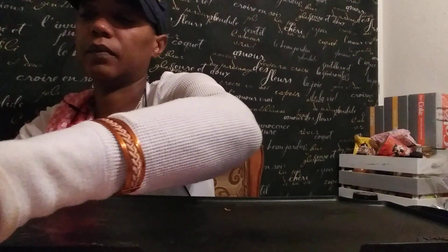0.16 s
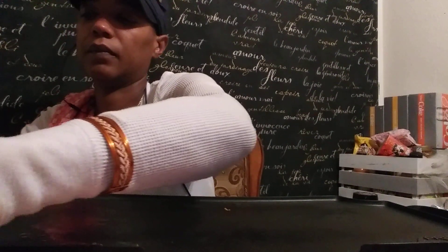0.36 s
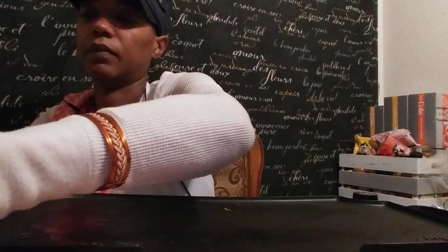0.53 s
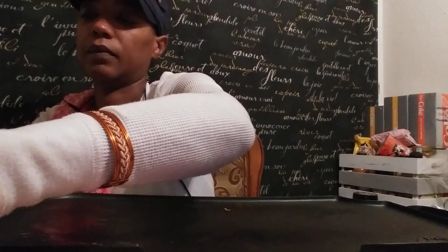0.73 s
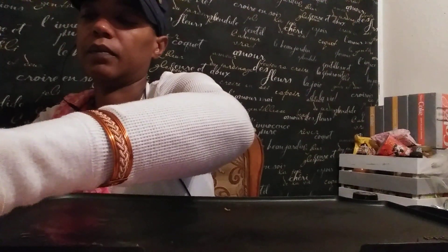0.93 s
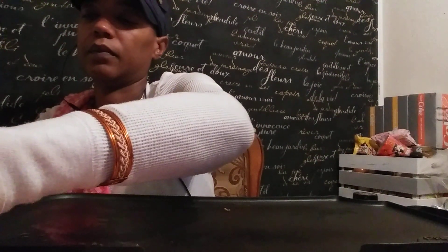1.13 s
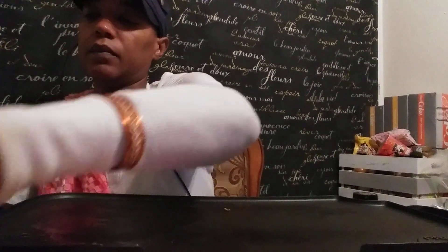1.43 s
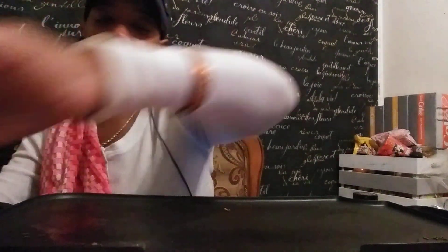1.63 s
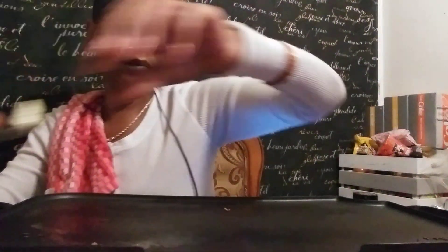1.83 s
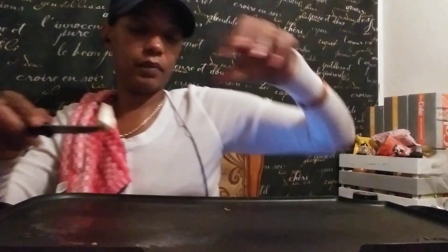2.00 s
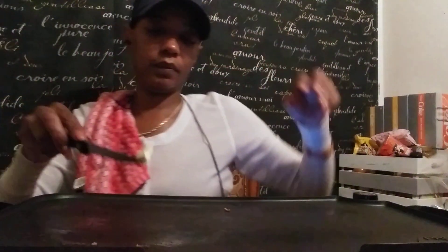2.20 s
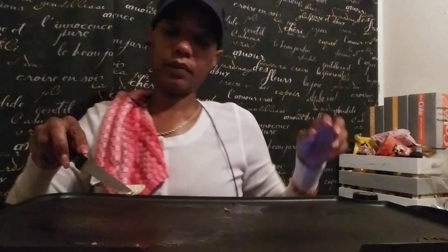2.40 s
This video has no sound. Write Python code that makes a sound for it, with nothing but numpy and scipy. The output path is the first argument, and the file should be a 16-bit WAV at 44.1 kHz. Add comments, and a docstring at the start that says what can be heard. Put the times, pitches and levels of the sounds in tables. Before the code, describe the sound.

Hard close clicks, a short ratcheting turn and one sharp snap in a quiet kitchen

```python
"""Hard clicks in a quiet kitchen

Close to the microphone a hand works something hard, probably a griddle's control: light clicks, a short
ratcheting turn, a soft knock and one sharp snap. Each is a burst of contact force filtered by a damped body;
echoes and a diffuse tail stand for the griddle top and the walls. Metal rings faintly as decaying sines,
and a fan-like hum and a thin hiss, both filtered noise, carry on underneath."""
import sys
import numpy as np
from scipy import signal
from scipy.fft import rfft, irfft
from scipy.io import wavfile
from scipy.ndimage import uniform_filter1d, minimum_filter1d

SR = 44100
rng = np.random.default_rng(int(sys.argv[2]) if len(sys.argv) > 2 else 0)


def to_wav(s):
    """Save 16-bit WAV."""
    ch = np.atleast_2d(s).T  # columns
    pcm = np.round(np.clip(ch, -1, 1) * 32767)  # PCM
    wavfile.write(sys.argv[1], SR, pcm.astype(np.int16))


N = 112454  # length [samples]


def amp(db):
    """Level to amplitude: 20 dB is a factor of ten."""
    return 10 ** (np.asarray(db) / 20)


def unit(x):
    """Power normalisation: scales to rms 1."""
    return x / np.sqrt(np.mean(x ** 2) + 1e-20)


def packet(x):
    """Energy normalisation: scales the sum of squares to 1."""
    return x / (np.linalg.norm(x) + 1e-20)


def read(points, hz):
    """Interpolation along a logarithmic frequency axis."""
    f, value = np.transpose(points)
    return np.interp(np.log(hz + 1), np.log(f + 1), value)


def add(mix, s, sound):
    """Superposition: sums a sound into the mix, in place, from a given time."""
    part = mix[max(round(s * SR), 0):][:len(sound)]
    part += sound[:len(part)]


def noise(colour):
    """Spectral shaping: white noise weighted to a given spectrum, at rms 1."""
    spectrum = rfft(rng.standard_normal(N))
    gain = amp(read(colour, np.fft.rfftfreq(N, 1 / SR)))
    return unit(irfft(spectrum * gain, N))


def body(colour, tilt_db=0, size=2048):
    """Minimum phase: the causal response of a damped object, tilted in dB per octave about 4 kHz."""
    hz = abs(np.fft.fftfreq(size, 1 / SR))
    octaves = np.log2(np.maximum(hz, 300) / 4000)
    log_gain = np.log(amp(read(colour, hz) + tilt_db * octaves))
    # the Hilbert transform of the log gain supplies the phase
    response = np.fft.ifft(np.exp(np.conj(signal.hilbert(log_gain)))).real
    return packet(response[:size // 2])


# chatter after an ordinary contact: level relative to the blow [dB], decay constant [s]
RATTLE_DB, RATTLE_S = -16, 0.005


def contact(s, scrape_s, crack_s, rattle_db=RATTLE_DB, rattle_s=RATTLE_S, hold_s=0, size=2048, count=8):
    """Impact force: a rising scrape, the blow and a brief chatter, nearly flat in spectrum."""
    t = (np.arange(size) - size // 4) / SR
    after = np.maximum(t - hold_s, 0)
    rise = np.exp(-abs(t) / max(scrape_s, 1 / SR))
    decay = np.maximum(np.exp(-after / crack_s), amp(rattle_db) * np.exp(-after / rattle_s))
    shape = np.where(t < 0, rise, decay)
    force = shape * rng.standard_normal(size)
    for _ in range(count):
        # flatten the spectrum, then restore the envelope
        force = irfft(np.exp(1j * np.angle(rfft(force))))
        local_rms = np.sqrt(abs(uniform_filter1d(force ** 2, size=24)) + 1e-14)
        force = shape * np.tanh(force / local_rms)
    out = np.zeros(N)
    add(out, s + t[0], packet(force))
    return out


def strike(force, colour, tilt_db=0):
    """Convolution: the force excites the response of the body it acts on."""
    return signal.oaconvolve(force, body(colour, tilt_db))[:N]


def catches(rows, colour, crack_s):
    """Stick and impact: parts scrape briefly and then catch."""
    out = np.zeros(N)
    for s, db, scrape_s, tilt_db in rows:
        out += amp(db) * strike(contact(s, scrape_s, crack_s), colour, tilt_db)
    return out


def ring(hz, db, t60, waver_hz=0):
    """Modal decay: one exponentially dying mode, cut at half a second, its pitch perhaps unsteady."""
    t = np.arange(SR // 2) / SR
    pitch = hz + waver_hz * unit(uniform_filter1d(rng.standard_normal(len(t)), size=300))
    return amp(db - 60 * t / t60) * np.sin(2 * np.pi * np.cumsum(pitch) / SR)


# colour of the snap: (frequency [Hz], relative gain [dB])
SNAP_COLOUR = [(100, -21.5), (400, -18), (680, -21.5), (860, -13), (1100, -30), (1450, -16), (1850, -9.5),
               (2060, -21), (2280, -12.5), (2750, -29), (3900, -7.5), (4450, -9.5), (5050, -4.5),
               (6200, -11), (7650, 2.5), (8250, 0.5), (9000, 2.5), (10100, -5.5), (11500, -16.5),
               (16000, -28)]
# early reflections of the snap: (time [s], level relative to the direct snap [dB])
SNAP_REFLECTIONS = [(1.0683, -8), (1.0715, -10.5), (1.0730, -13), (1.0773, -16)]
SNAP_S, SNAP_CRACK_S, SNAP_HOLD_S = 1.0614, 0.0004, 0.001  # onset, decay constant, time held before it [s]


def snap():
    """Snap-through: a stiff spring flips over with a sharp crack and brief rattle; surfaces and room answer."""
    force = contact(SNAP_S, 0.0002, SNAP_CRACK_S, rattle_db=-10, hold_s=SNAP_HOLD_S)
    for s, db in SNAP_REFLECTIONS:
        force = force + amp(db) * contact(s, 0, SNAP_CRACK_S, hold_s=SNAP_HOLD_S)
    add(force, SNAP_S, diffuse(tail_db=-9, scatter_db=-15))
    return strike(force, SNAP_COLOUR)


# teeth of the ratchet: (time [s], relative level [dB], scrape before the catch [s],
# treble tilt [dB per octave], knock frequency [Hz], relative knock level [dB])
TEETH = [(0.4648, -20.5, 0.00152, -.5, 1550, -33), (0.4902, -22, 0.00138, 0, 785, -32.5),
         (0.5144, -19.5, .001, 2.5, 1010, -46.5), (0.5372, -26, 0.00043, 4.5, 2300, -48),
         (0.5440, -26, 0.0016, 0, 2320, -39), (0.5509, -32, 0.0018, -1, 1500, -50),
         (0.5613, -29.5, .0004, 3, 2180, -48), (0.569, -39, 0.0014, 0, 2260, -61)]
# body struck by the teeth: (frequency [Hz], relative gain [dB])
TOOTH_COLOUR = [(100, -8), (400, -3.5), (830, -6.5), (1100, -7.5), (1550, -4.5), (2300, -2), (2750, -13),
                (3900, 0), (4450, -7), (5100, 0), (6600, -9), (7900, 9), (9500, -4.5), (11500, -16),
                (16000, -32)]


def ratchet():
    """Serial impact: each tooth scrapes, catches and knocks a different part of the casing."""
    out = catches([row[:4] for row in TEETH], TOOTH_COLOUR, crack_s=0.0012)
    for s, _, _, _, hz, db in TEETH:
        add(out, s, amp(db) * packet(ring(hz, 0, t60=0.0156)))
    return out


# spectrum of the rub: (frequency [Hz], relative gain [dB])
RUB_COLOUR = [(200, -10), (800, -1), (1200, -11), (2200, -11), (2800, -2), (5000, -7), (6600, -0.5),
              (8000, 2.5), (9300, -12), (11000, -2), (16000, -11)]
RUB_START_S, RUB_END_S, RUB_FADE_S = 0.466, 0.573, 0.008  # the parts grind between the teeth
GRAINS_PER_S, SPREAD_DB = 1800, 9.5  # mean rate; scale of the exponential spread in level, capped at 3 times


def rub():
    """Stick-slip friction: tiny slips, dense and uneven, for as long as the turn lasts."""
    t = np.arange(N) / SR
    slips = rng.random(N) < GRAINS_PER_S / SR
    signs = rng.choice([-1., 1.], N)
    sizes = amp(SPREAD_DB * np.minimum(rng.exponential(1, N), 3))
    grinding = unit(strike(slips * signs * sizes, RUB_COLOUR))
    turning = np.clip(np.minimum(t - RUB_START_S, RUB_END_S - t) / RUB_FADE_S, 0, 1)
    return amp(-64) * turning * grinding


# soft knocks and ticks: (time [s], relative level [dB], scrape before the blow [s], treble tilt [dB per octave])
KNOCKS = [(0.8745, -48, .002, 3.5), (0.8905, -44, .002, -3), (0.8988, -35, 0.0013, -2),
          (0.9150, -33.5, .001, -3.5), (1.1745, -31, .002, -5.5), (1.374, -52, .001, 6),
          (2.055, -52, .001, 9)]
# body struck by the knocks: (frequency [Hz], relative gain [dB])
KNOCK_COLOUR = [(100, -9.5), (400, 1), (800, -0.5), (1100, -6.5), (1600, 1.5), (2300, -2), (2800, -10),
                (4500, -5), (5200, -1), (6300, -17), (8600, 1.5), (11000, -10), (16000, -22)]


def knocks():
    """Damped impact: soft knocks and ticks, each after a brief scrape."""
    return catches(KNOCKS, KNOCK_COLOUR, crack_s=0.0022)


# light clicks: (time [s], relative level [dB], casing ring relative to the click [dB],
# treble tilt [dB per octave])
CLICKS = [(0.1604, -47.5, -10, -1.5), (0.2245, -35, -5.5, 1.5), (0.2531, -20, -16.5, 0.5),
          (0.2903, -16.5, -2.5, -1)]
# body struck by the clicks: (frequency [Hz], relative gain [dB])
CLICK_COLOUR = [(100, -36), (500, -22), (950, -10.5), (1200, -23), (2150, 0.5), (2700, -17), (3000, -9.5),
                (3800, 1.5), (4450, -5.5), (5200, 0.5), (6800, -12.5), (8200, 4), (9700, -3), (11000, -16),
                (12200, -12), (16000, -25)]
# modes of the small casing: (frequency [Hz], relative level [dB], 60 dB decay time [s])
CASING = [(2310, 8, 0.028), (2304, 17, 0.013), (3700, -26, 0.0056), (4730, -5, 0.013), (5400, -23, .008)]


def clicks():
    """Impact and modal response: light clicks in the room, each ringing a small casing."""
    blows, ringing = np.zeros(N), np.zeros(N)
    casing = packet(sum(ring(*mode) for mode in CASING))
    for s, db, ring_db, tilt_db in CLICKS:
        force = contact(s, 0, crack_s=0.0015)
        blows += amp(db) * strike(force, CLICK_COLOUR, tilt_db)
        add(ringing, s, amp(db + ring_db) * casing)
    return kitchen(blows, wet_db=-3, echo_db=-5) + kitchen(ringing, wet_db=-3, echo_db=-11)


# faint ringing metal: (start time [s], frequency [Hz], level [dB], 60 dB decay time [s])
RINGS = [(0.0, 2343, -61, 0.28), (0.0, 3030, -71.5, 0.35), (0.29, 2106, -69, .8), (0.29, 2550, -63.5, .8),
         (0.29, 3780, -70.5, 0.95)]
# spectrum of the slide: (frequency [Hz], relative gain [dB])
SLIDE_COLOUR = [(1500, -20), (2400, -3), (3600, -18), (4750, 0), (5300, -8), (6300, -20), (12000, -24)]
SLIDE_S, SLIDE_WIDTH_S = 0.05, 0.042  # centre and standard deviation of the swell


def metal():
    """Modal ringing and friction: faint decaying modes and a light slide over metal."""
    swell = np.exp(-((np.arange(N) / SR - SLIDE_S) / SLIDE_WIDTH_S) ** 2 / 2)
    out = amp(-67) * noise(SLIDE_COLOUR) * swell
    for s, hz, db, t60 in RINGS:
        add(out, s, ring(hz, db, t60, waver_hz=7))
    return out


# dull bumps of handling: (centre time [s], level [dB], frequency [Hz], half-length to 1/e [s])
BUMPS = [(0.029, -65.5, 69.5, 0.013), (0.138, -58, 353, 0.013), (0.844, -50.5, 203, .008),
         (1.008, -53.5, 110, 0.0045), (1.145, -61.5, 62, 0.032), (1.265, -63, 75, 0.014),
         (1.55, -53.5, 179, 0.016), (2.138, -56, 157, 0.0072), (2.28, -53, 174, .008),
         (2.39, -60.5, 118, 0.0085), (2.432, -65, 60, 0.027), (2.531, -61, 74.2, 0.016)]


def bumps():
    """Gaussian wave packets: soft low pushes, each only a brief group of cycles."""
    t = np.arange(N) / SR
    out = np.zeros(N)
    for s, db, hz, length in BUMPS:
        envelope = np.exp(-((t - s) / length) ** 2)
        out += amp(db) * envelope * np.sin(2 * np.pi * (hz * (t - s) + rng.random()))
    return out


# spectrum of the room tone: (frequency [Hz], relative density [dB per Hz])
ROOM_TONE = [(15, -62), (25, -34), (59, -21.5), (91, -31.5), (116, -12.5), (152, -10.5), (183, -4),
             (215, -8), (267, -6.5), (313, -8.5), (340, -8), (399, -10.5), (598, -13.5), (684, -21.5),
             (782, -18.5), (919, -23.5), (6210, -35), (8350, -28), (15500, -36.5)]
# bands of the hum: (frequency [Hz], level [dB], full width at half amplitude [Hz])
HUM = [(131.5, -73.5, 10), (183.7, -67.5, 27), (346.5, -71.5, 12), (514.6, -77.5, 8)]


def background():
    """Stationary noise: a coloured room tone, and narrow resonant bands that waver as a hum."""
    f = np.fft.rfftfreq(N, 1 / SR)
    hum = np.zeros(N)
    for hz, db, width in HUM:
        resonance = 1 / (1 + (2 * (f - hz) / width) ** 2)
        hum += amp(db) * unit(irfft(rfft(rng.standard_normal(N)) * resonance, N))
    return amp(-61.5) * noise(ROOM_TONE) + hum


# decay of the room: (frequency [Hz], 60 dB decay time [s])
TAIL_T60 = [(200, 0.45), (1000, 0.34), (2500, 0.45), (5000, .33), (8500, 0.28), (15000, 0.2)]
# spectrum of the tail: (frequency [Hz], relative gain [dB])
TAIL_COLOUR = [(200, -6.5), (1000, -2), (2400, -10.5), (4000, -5), (5000, -5.5), (8500, -0.5), (15000, 2.5)]


def diffuse(tail_db, scatter_db):
    """Diffuse field: dense scatter from things nearby, then a short tail decaying by frequency."""
    size = SR // 2
    t = np.arange(size) / SR
    hz, when, z = signal.stft(rng.standard_normal(size), SR, nperseg=256)
    decay_db = 60 * when / read(TAIL_T60, hz)[:, None]
    z = z * amp(read(TAIL_COLOUR, hz)[:, None] - decay_db)
    fade_in = np.clip(t / 0.011 - 0.5, 0, 1)
    tail = packet(signal.istft(z, SR, nperseg=256)[1][:size] * fade_in)
    scatter = packet(rng.standard_normal(size) * (t > 0.007) * np.exp(-t / 0.012))
    return amp(tail_db) * tail + amp(scatter_db) * scatter


# early reflections: (delay [s], relative level [dB])
ECHOES = [(.0068, -8.5), (.0077, -13.5), (.0096, -9.5), (.0114, -7), (.0161, -14.5)]


def kitchen(x, wet_db, echo_db):
    """Room impulse response: the direct sound, single reflections and the diffuse field."""
    response = diffuse(tail_db=wet_db - 7, scatter_db=wet_db - 9.5)
    for delay, db in ECHOES:
        add(response, delay, amp([db + echo_db]))
    return x + signal.fftconvolve(x, response)[:N]


def scene():
    """Superposition: the handling sounds in the room, over the background."""
    turn = ratchet() + rub() + knocks()
    near = snap() + kitchen(turn, wet_db=-2.5, echo_db=-14.5) + clicks()
    # one common gain lifts the close handling by 8 dB
    return (amp(8) * near + metal() + bumps() + background())[None]


CEILING = 0.42  # limiter threshold [fraction of full scale]


def record(dry):
    """Recording chain: a bass roll-off, a peak limiter and a band limit."""
    dry = signal.sosfilt(signal.butter(2, 45, "high", fs=SR, output="sos"), dry)
    needed = CEILING / np.maximum(abs(dry), CEILING)
    gain = uniform_filter1d(minimum_filter1d(needed, size=131), size=131)  # about 3 ms
    low_pass = signal.firwin(511, 16000, window=("kaiser", 9), fs=SR)
    return signal.oaconvolve(dry * gain, low_pass[None], "same")


dry = scene()
out = record(dry)
to_wav(out)
```